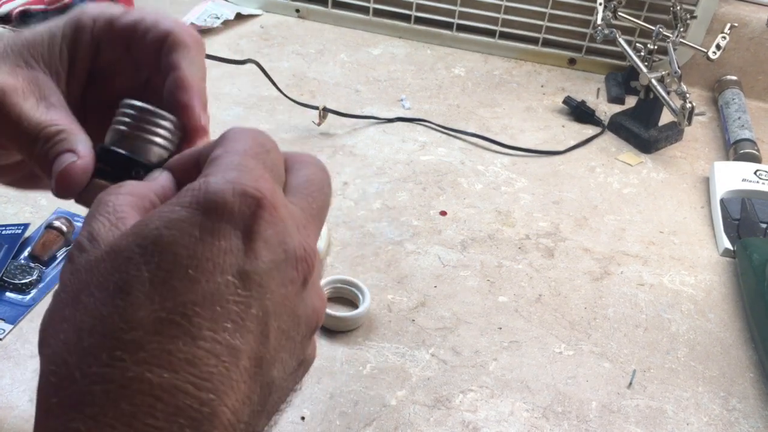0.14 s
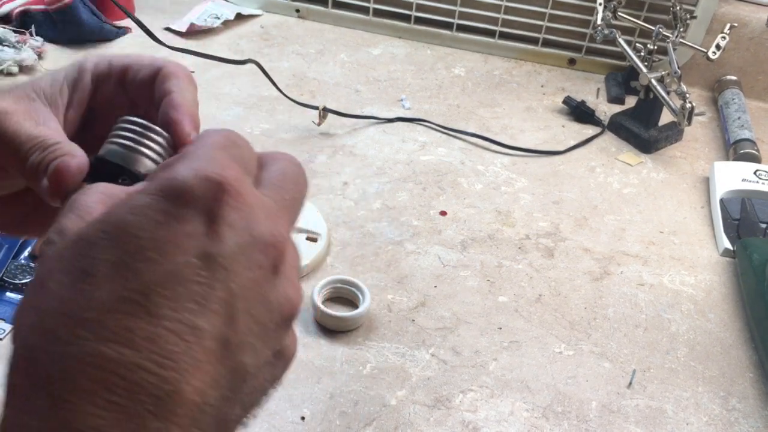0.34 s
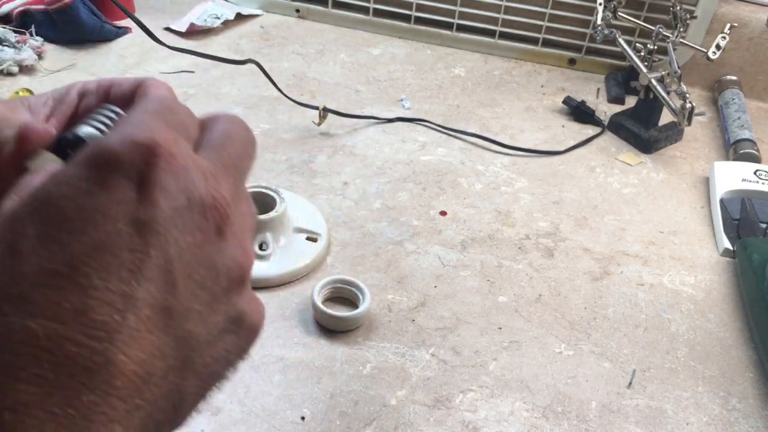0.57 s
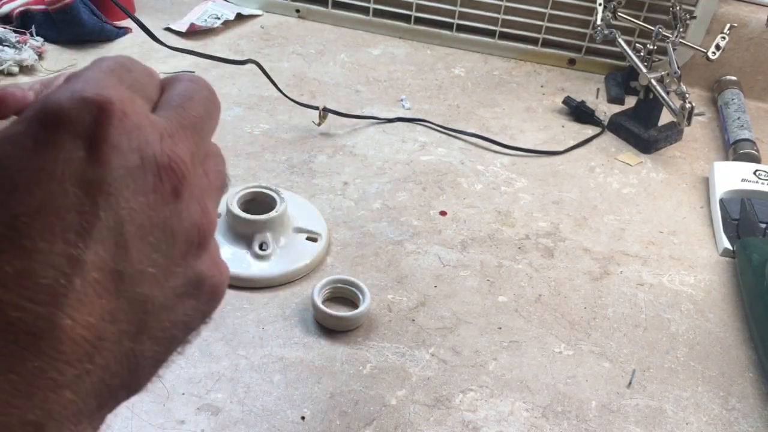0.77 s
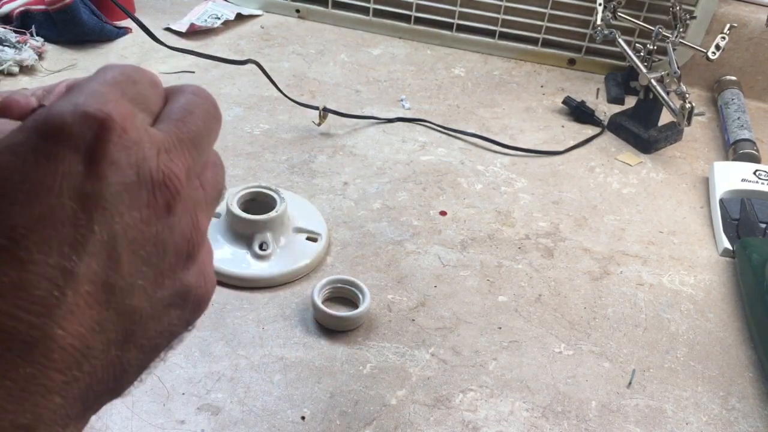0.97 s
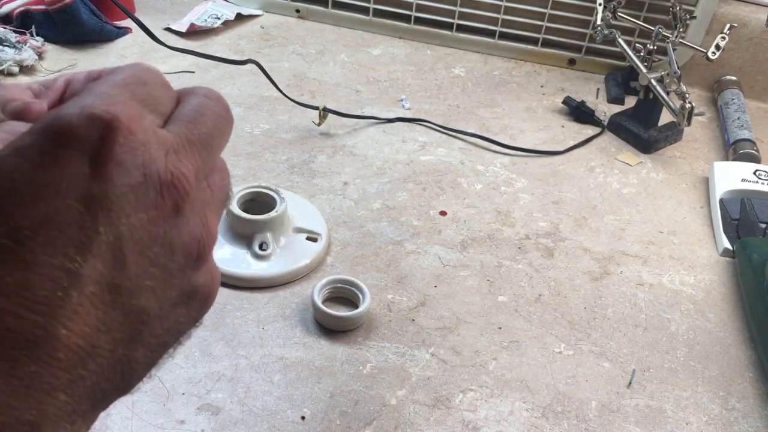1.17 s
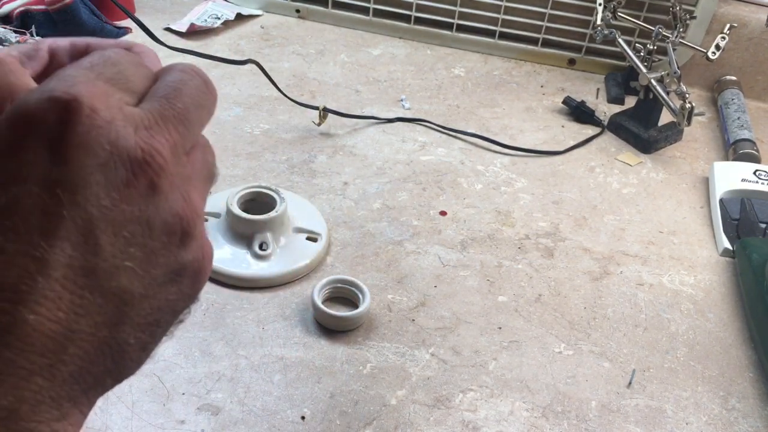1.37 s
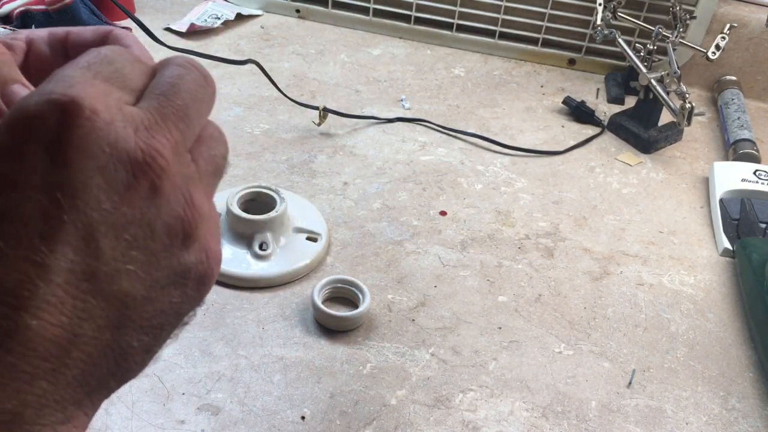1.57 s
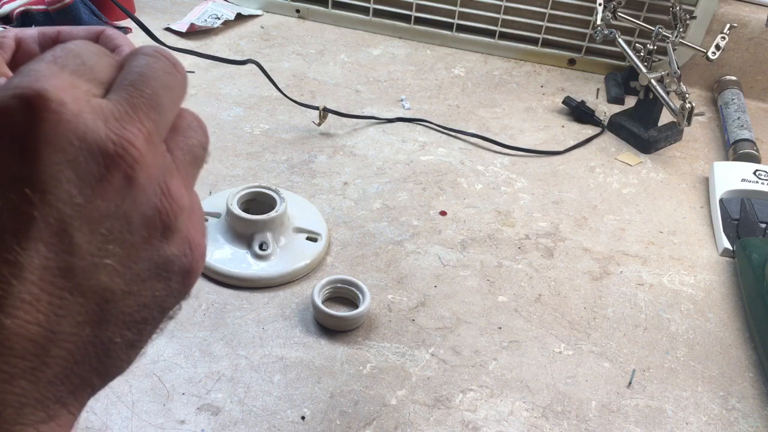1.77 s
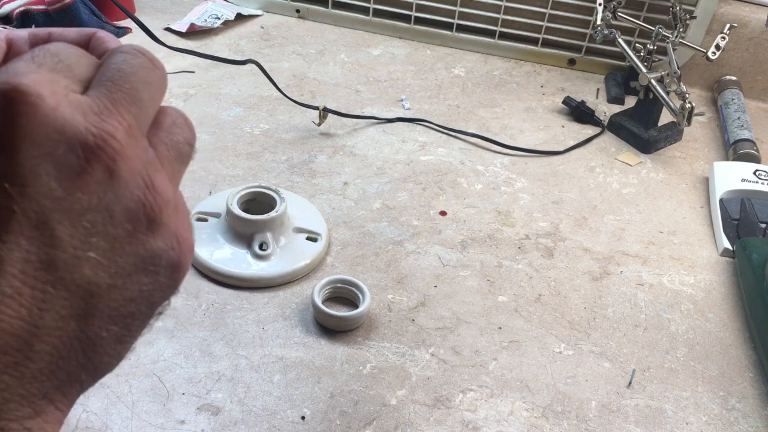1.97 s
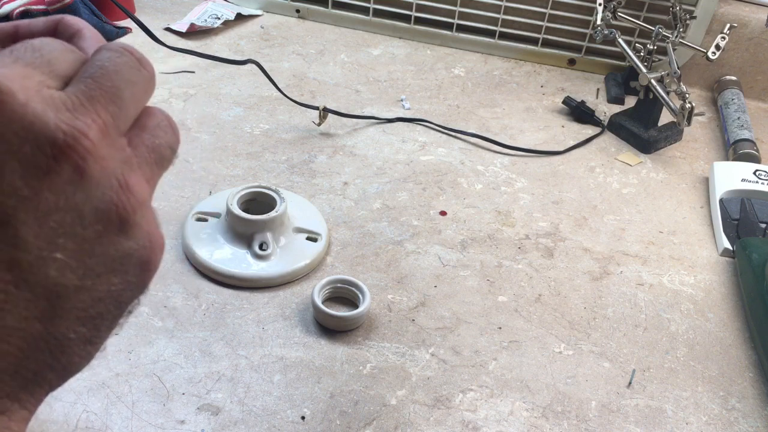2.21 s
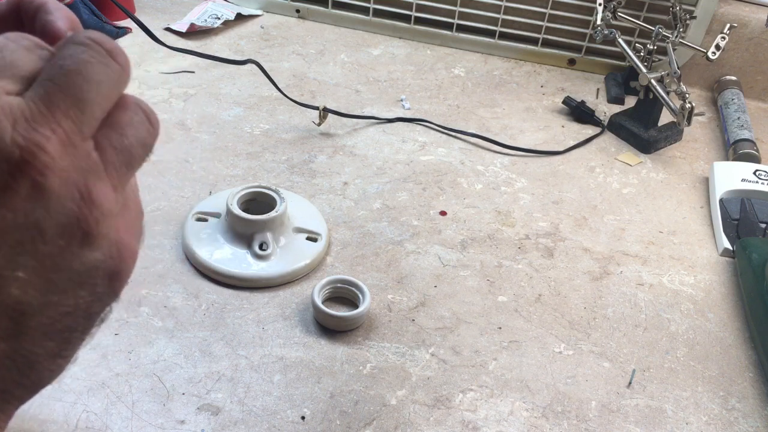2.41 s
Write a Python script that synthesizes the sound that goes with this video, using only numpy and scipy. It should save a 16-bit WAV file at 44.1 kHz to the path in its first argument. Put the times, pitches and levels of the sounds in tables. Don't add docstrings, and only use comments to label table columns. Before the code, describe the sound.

A metal lamp-socket switch snaps over at 0.22 s: one loud, dry, bright crack with tiny rebounds and a short ringing tail. Very faint ticks lead in from 0.17 s; hiss rises with the snap and drops at 0.63 s. Isolated ticks come at 0.44 and 0.75 s, soft gritty scrapes and clicks at 1.25-1.65 s, a faint tick at 1.97 s. Low motor and fan hum continues throughout.

```python
import sys
import numpy as np
from scipy import signal
from scipy.fft import rfft, irfft
from scipy.io import wavfile

SR = 44100
rng = np.random.default_rng(int(sys.argv[2]) if len(sys.argv) > 2 else 0)


def volts(x):
    e = np.asarray(x, float) / 20
    return 10 ** e


def dump(signal):
    limited = np.clip(np.atleast_2d(signal).T, -1, 1)
    pcm = np.round(limited * 32767).astype(np.int16)
    wavfile.write(sys.argv[1], SR, pcm)


N = 108045

# (time [s], peak level [dB])
SNAP_CONTACTS = [
    (.2235, 0),
    (.22479, -16),
    (.2269, -21),
    (.2287, -24),
    (.2305, -26),
    (.2333, -28),
]


def rms_one(x):
    return x / np.sqrt(np.mean(x ** 2) + 1e-20)


def drift(rate_hz):
    step = 40
    settle = 2000
    r = np.exp(-2 * np.pi * rate_hz * step / SR)
    white = rng.standard_normal(N // step + settle + 2)
    slow = signal.lfilter([1], [1, -2 * r, r * r], white)[settle:]
    return np.interp(np.arange(N) / step, np.arange(len(slow)), rms_one(slow))


def ring(x, hz, t60_s):
    r = volts(-60 / (t60_s * SR))
    w = 2 * np.pi * hz / SR
    return signal.lfilter([0, np.sin(w)], [1, -2 * r * np.cos(w), r * r], x + 1e-18)


def noise(colour, patchy_db=0):
    hz = np.fft.rfftfreq(N, 1 / SR) + 1
    point_hz, point_db = np.transpose(colour)
    level_db = np.interp(np.log(hz), np.log(point_hz), point_db, left=-90, right=-90)
    spectrum = volts(level_db) * rfft(rng.standard_normal(N))
    if not patchy_db:
        return rms_one(irfft(spectrum, N))
    third_octave = 3 * np.log2(hz)
    out = np.zeros(N)
    for k in range(14, 36):
        overlap = np.clip(1 - abs(third_octave - k), 0, 1)
        out += irfft(spectrum * overlap, N) * volts(patchy_db * drift(14))
    return rms_one(out)


def dying(start_s, t60_s):
    t = np.arange(N) / SR - start_s
    return (t >= 0) * volts(-60 * np.clip(t, 0, 3 * t60_s) / t60_s)


def hum():
    # (frequency [Hz], rms level [dB], flutter [dB])
    tones = [(59.2, -49.2, .5), (408, -73.5, 2.5), (641.5, -78, 2), (761, -88, 2)]
    # (frequency [Hz], rms level [dB], width [Hz])
    resonances = [(43.7, -64, 8.6), (123.05, -57.5, 6.2), (175.5, -64.5, 8.2), (240.3, -69, 6.2),
                  (308.6, -70, 25), (980.5, -83.5, 44)]
    t = np.arange(N) / SR
    out = np.zeros(N)
    for hz, db, flutter_db in tones:
        height = np.sqrt(2) * volts(db + flutter_db * drift(4))
        out += height * np.sin(2 * np.pi * hz * t + .6 * drift(1.5))
    for hz, db, width_hz in resonances:
        t60_s = 2.0 / width_hz
        once = ring(rng.standard_normal(N + SR), hz, t60_s)
        twice = ring(once, hz, t60_s)
        out += volts(db) * rms_one(twice[SR:])
    return out


def fan():
    # (frequency [Hz], density [dB per Hz])
    colour = [(18, -30), (30, -3), (72, -7.5), (206, -18.5), (400, -26), (473, -30.5), (648, -32),
              (724, -34.5), (2500, -57), (3250, -81.5), (5500, -120)]
    level_db, patchy_db, low_cut_hz = -51, 2.5, 42
    low_cut = signal.butter(10, low_cut_hz, "high", fs=SR, output="sos")
    return volts(level_db) * signal.sosfilt(low_cut, noise(colour, patchy_db))


def microphone_hiss():
    # (frequency [Hz], density [dB per Hz])
    colour = [(880, -34), (1500, -4), (2340, -3), (2630, -6), (4800, -11), (5620, -8), (10100, -7),
              (12400, -2.5), (15800, -7)]
    level_db = -72
    return volts(level_db) * noise(colour)


def ticks():
    # (time [s], peak level [dB], pitch [Hz], ring t60 [ms], crack level [dB])
    contacts = [(.1668, -43, 11300, 3, -72), (.1672, -49, 14200, 3, -72), (.184, -53, 11500, 3, -75),
                (.2000, -50, 13600, 3, -67), (.2003, -50, 11600, 3, -75), (.212, -54, 12000, 3, -74),
                (.2175, -60, 8700, 4, -77), (.4445, -50, 8250, 12, -62), (.755, -60, 2500, 4, -66),
                (1.2443, -62, 11900, 10, -68), (1.247, -63, 8500, 10, -72), (1.2842, -63, 4700, 6, -67),
                (1.3091, -60, 9090, 6, -66), (1.324, -56, 5800, 15, -66), (1.3502, -48, 9090, 10, -53),
                (1.3545, -45, 9090, 14, -54), (1.3535, -54, 4900, 12, -70), (1.3555, -55, 3900, 10, -70),
                (1.353, -58, 2400, 12, -70), (1.3505, -49, 13900, 18, -70), (1.4195, -56, 9100, 8, -60),
                (1.4817, -63, 11000, 6, -70), (1.6104, -63, 14300, 10, -68), (1.9692, -59, 5800, 3, -62),
                (1.9694, -61, 4200, 4, -75), (1.9695, -57, 14100, 10, -72)]
    crack_t60_s = .014
    bright = noise([(2000, -5.0), (5000, -0.5), (12000, 0), (15800, -2.5)])
    out = np.zeros(N)
    for s, db, hz, t60_ms, crack_db in contacts:
        click = np.zeros(N)
        click[int(s * SR)] = volts(db)
        out += ring(click, hz, t60_ms / 1e3)
        out += bright * volts(crack_db) * dying(s, crack_t60_s)
    return out


def snap():
    # (frequency [Hz], level [dB], t60 [s], polarity [+1 or -1])
    body = [(2070, -23.5, .006, 1), (2940, -21, .0053, -1), (4920, -26.5, .015, -1), (6600, -36, .01, 1),
            (8075, -20, .0127, 1), (8665, -25, .0156, 1), (10610, -14, .0085, -1), (12090, -4.6, .0035, 1),
            (13700, -8.2, .0084, -1), (15250, -26, .0066, 1)]
    # (frequency [Hz], level [dB], t60 [s])
    shell = [(1620, -25, .4), (2842, -11, .17), (3058, -10, .1), (3950, -8, .08), (5230, -14, .1),
             (4317, -.5, .125), (8550, -4, .07), (8770, -2, .08), (11146, -6, .08), (11670, 4, .09),
             (12040, -2, .1), (13700, -2, .1), (13930, -5, .1), (2250, -6, .12)]
    # (frequency [Hz], density [dB per Hz])
    early = [(530, -55), (900, -23.5), (1850, -15), (2240, -1.5), (3700, -11.5), (4230, -5), (5700, -10),
             (14000, 2), (15800, -15.5)]
    # (frequency [Hz], density [dB per Hz])
    late = [(880, -42), (1500, -14.5), (2790, -8.5), (3940, -15), (4300, -10.5), (9560, -5), (12700, 1.5),
            (15800, -10)]
    shell_db, low_cut_hz = -39, 1555
    early_db, early_t60_s = -31, .054
    late_db, late_t60_s = -37.5, .21

    time_s, peak_db = np.transpose(SNAP_CONTACTS)
    at = [int(s * SR) for s in time_s]
    luck_db = rng.normal(0, 2.7, (len(at), len(body)))
    luck_db[:2] = 0
    out = np.zeros(N)
    for k, (hz, db, t60_s, polarity) in enumerate(body):
        clicks = np.zeros(N)
        clicks[at] = volts(peak_db + db + luck_db[:, k])
        out += ring(clicks, hz, t60_s) * np.sign(polarity)

    first = np.zeros(N)
    first[at[0]] = volts(shell_db)
    for k, (hz, db, t60_s) in enumerate(shell):
        out += ring(first * volts(db), hz, t60_s) * (-1) ** k

    echo_s = time_s[1]
    out += noise(late) * volts(late_db) * dying(echo_s, late_t60_s)
    out += noise(early) * volts(early_db) * dying(echo_s, early_t60_s)
    low_cut = signal.butter(4, low_cut_hz, "high", fs=SR, output="sos")
    return signal.sosfilt(low_cut, out)


def coarse_range_hiss():
    # (frequency [Hz], density [dB per Hz])
    colour = [(710, -28), (1200, 2), (2040, -2.5), (3200, -0.5), (4930, -4.5), (9520, -4), (15800, -4.5)]
    level_db, on_s, off_s, fade_s = -63, .2238, .632, .004
    t = np.arange(N) / SR
    gate = (t > on_s) * np.clip((off_s - t) / fade_s + .5, 0, 1)
    return volts(level_db) * gate * noise(colour)


def rubbing():
    # (time [s], level [dB])
    grit_curve = [(1.22, -93.5), (1.245, -75), (1.27, -84), (1.287, -74), (1.303, -77), (1.31, -71),
                  (1.345, -60), (1.356, -60.5), (1.375, -66.5), (1.41, -76.5), (1.425, -71), (1.45, -80),
                  (1.49, -78), (1.59, -81), (1.612, -70.5), (1.66, -69), (1.73, -86), (2.0, -99)]
    # (time [s], length [s], frequency [Hz], rms level [dB])
    strokes = [(1.26, .03, 5800, -79), (1.282, 0.024, 3600, -79.5), (1.312, .035, 5760, -70),
               (1.308, 0.045, 9090, -70), (1.345, 0.037, 9440, -65), (1.308, .04, 14000, -74),
               (1.308, .03, 10400, -75), (1.325, .03, 6940, -79), (1.34, 0.068, 4960, -75),
               (1.348, .06, 14100, -68), (1.36, 0.077, 5900, -75), (1.375, .04, 13000, -73),
               (1.395, 0.046, 9090, -78), (1.417, .015, 7000, -73), (1.417, .01, 10800, -75),
               (1.425, .014, 3900, -77), (1.485, 0.071, 5860, -82), (1.503, 0.025, 3600, -79),
               (1.6, 0.037, 4700, -76), (1.604, .018, 14550, -70), (1.604, .02, 11200, -70),
               (1.608, .012, 3400, -76), (1.611, .02, 14000, -71), (1.614, 0.011, 10200, -71),
               (1.615, .014, 8800, -73), (1.626, .028, 11300, -74), (1.628, .012, 6000, -77),
               (1.635, .07, 14100, -77), (1.89, .045, 4830, -83), (1.9, .03, 3400, -83.5),
               (1.969, 0.021, 4900, -75.5), (1.969, .018, 3230, -78), (1.969, .012, 10600, -72)]
    grits_per_s, spread_db = 7000, 3
    stroke_t60_s, wobble_db = .01, 2

    t = np.arange(N) / SR
    height = volts(spread_db * np.minimum(rng.exponential(1, N), 4))
    sign = rng.choice([-1, 1], N)
    grit = height * sign * (rng.random(N) < grits_per_s / SR)
    band = signal.butter(1, [3500, 15000], "band", fs=SR, output="sos")
    bare = rms_one(signal.sosfilt(band, grit))
    out = volts(np.interp(t, *np.transpose(grit_curve))) * bare

    wobble = volts(wobble_db * drift(35))
    for k, (s, length_s, hz, db) in enumerate(strokes):
        progress = np.clip((t - s) / length_s, 0, 1)
        pressure = np.sqrt(np.sin(np.pi * progress ** .6).clip(0))
        rung = wobble * ring(grit, hz, stroke_t60_s)
        stroke = pressure * np.roll(rung, 997 * k)
        out += volts(db) * rms_one(stroke) * np.sqrt(length_s * SR / N)
    return out


def scene():
    room = hum() + fan()
    hands = ticks() + snap() + rubbing()
    return (room + hands)[None]


def band_limit(x):
    return signal.sosfilt(signal.butter(12, 17110, fs=SR, output="sos"), x)


def record(dry):
    cutoff_hz, pass_s = 15980, .002
    t = np.arange(N) / SR
    x = dry + microphone_hiss() + coarse_range_hiss()
    top_cut = signal.cheby2(24, 40, cutoff_hz, fs=SR, output="sos")
    kept = signal.sosfiltfilt(top_cut, x)
    instant = np.exp(-((t - SNAP_CONTACTS[0][0]) / pass_s) ** 2)
    mix = kept + (x - kept) * instant
    return band_limit(mix)


dry = scene()
out = record(dry)
dump(out)
```